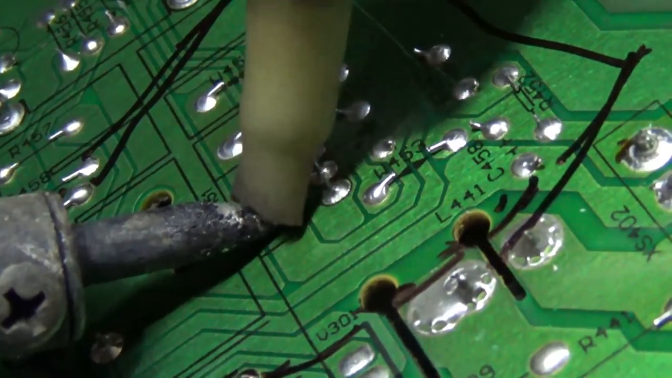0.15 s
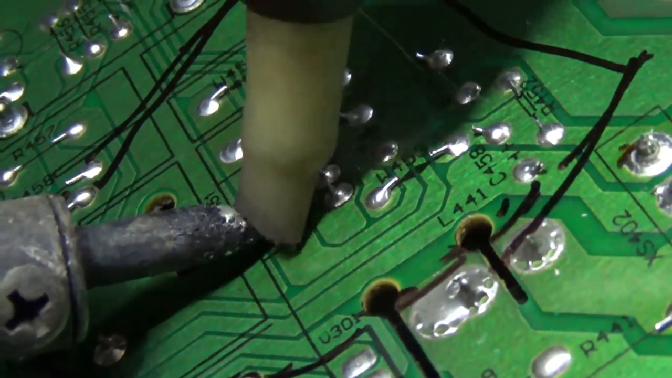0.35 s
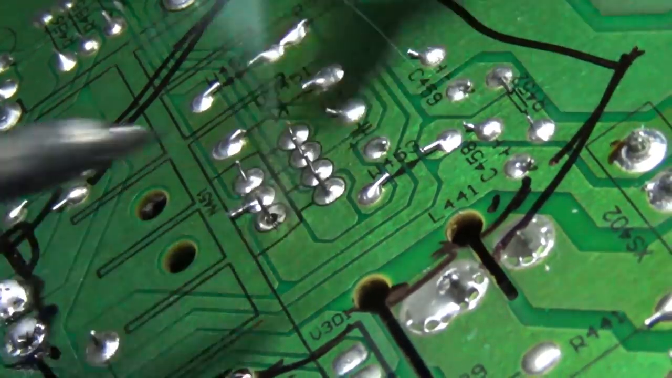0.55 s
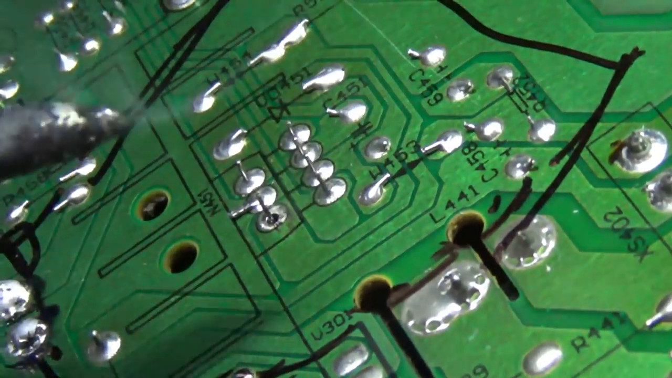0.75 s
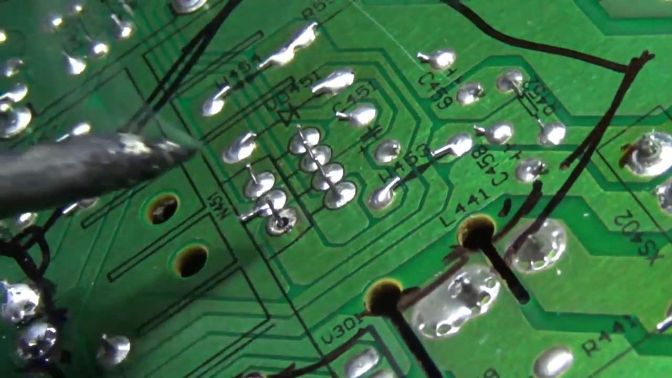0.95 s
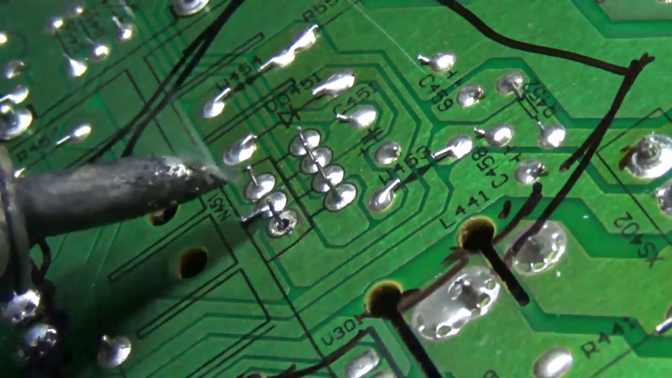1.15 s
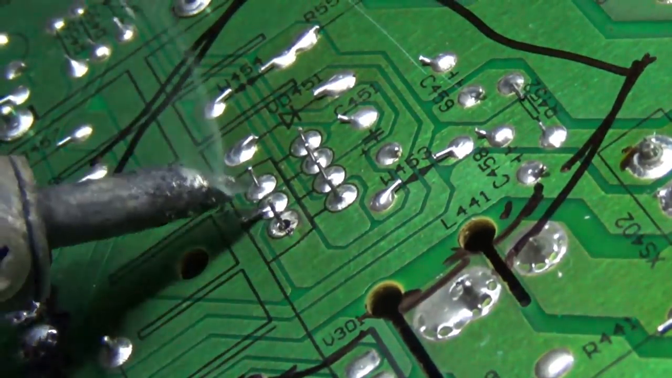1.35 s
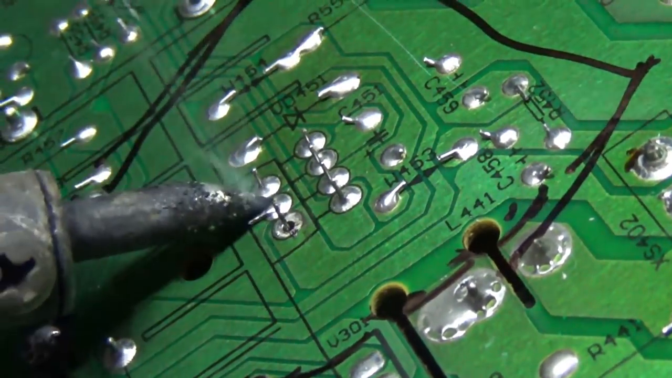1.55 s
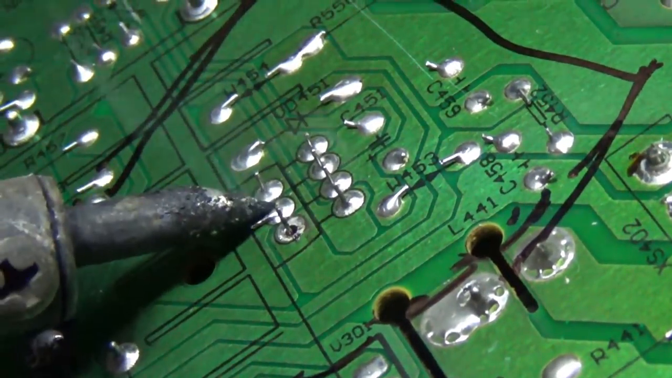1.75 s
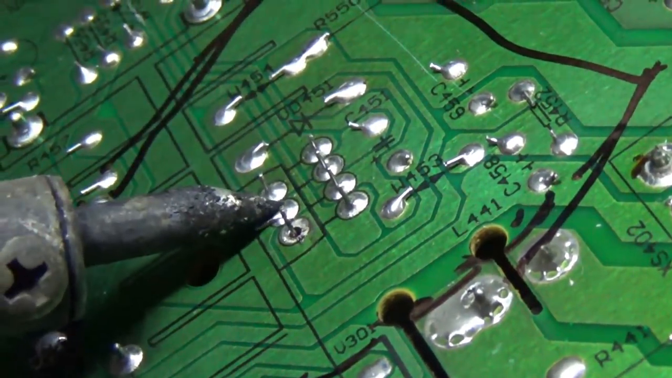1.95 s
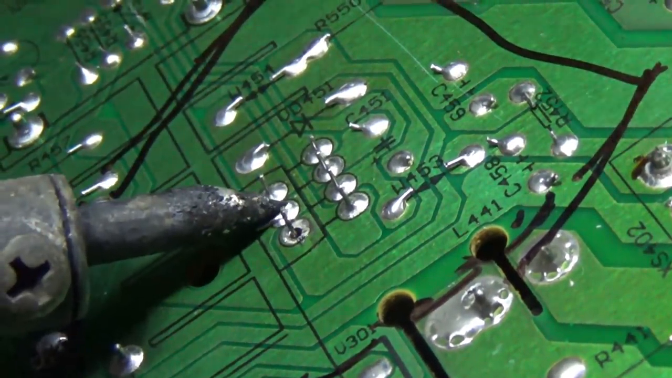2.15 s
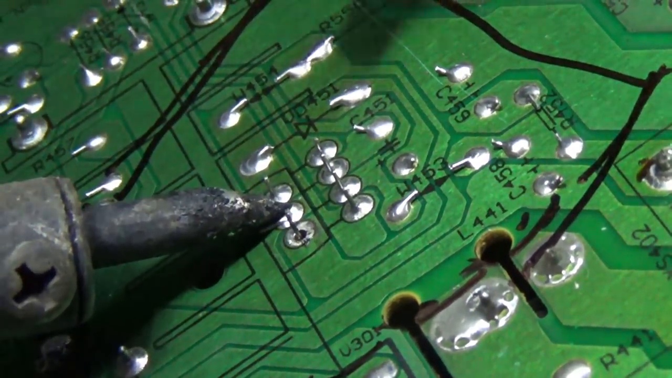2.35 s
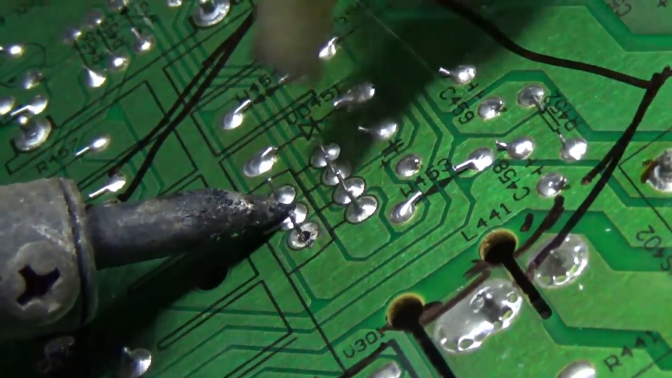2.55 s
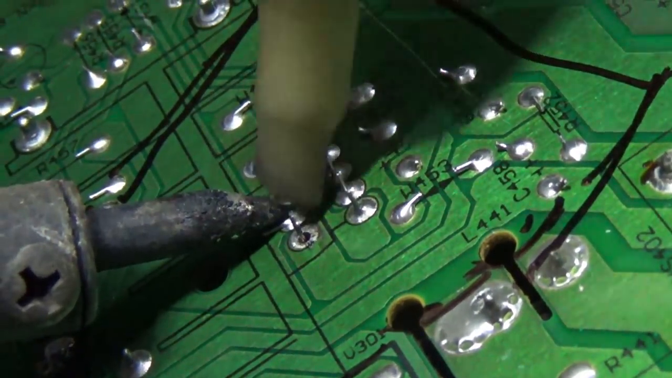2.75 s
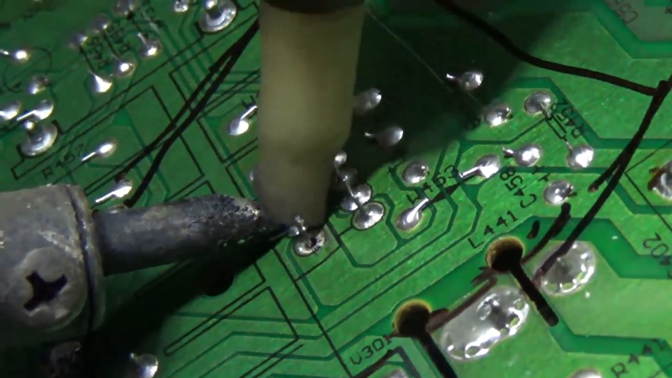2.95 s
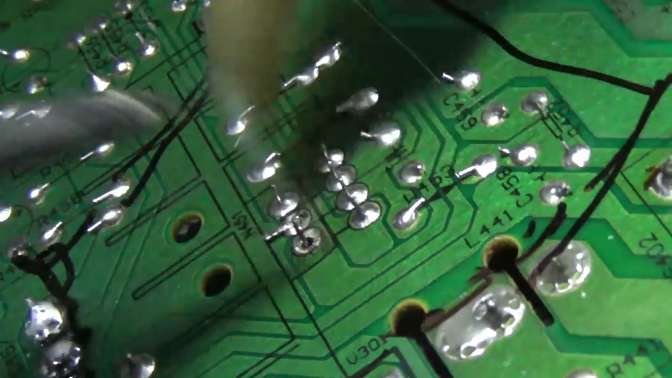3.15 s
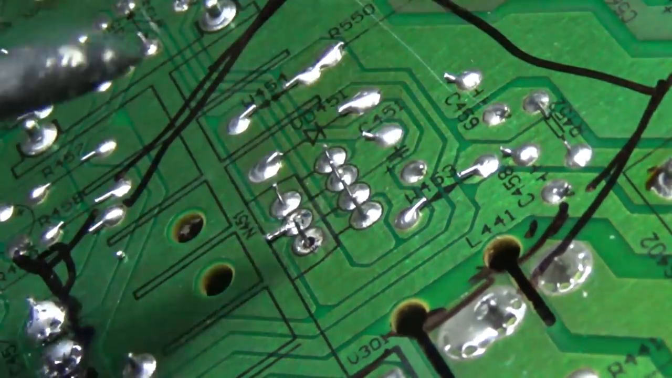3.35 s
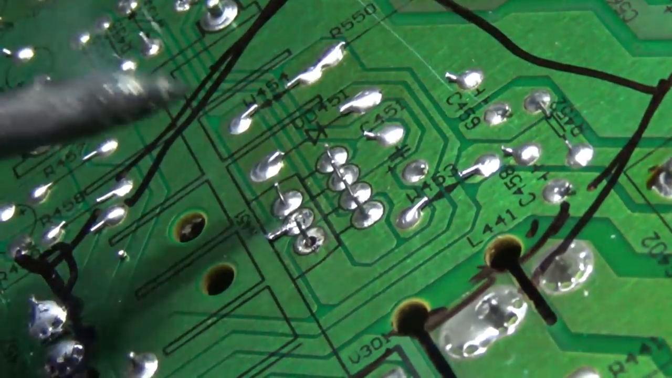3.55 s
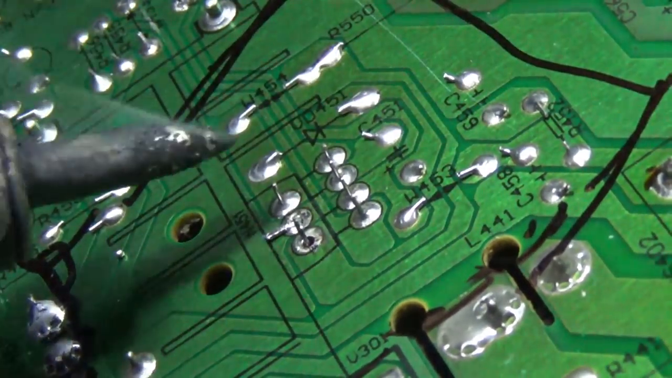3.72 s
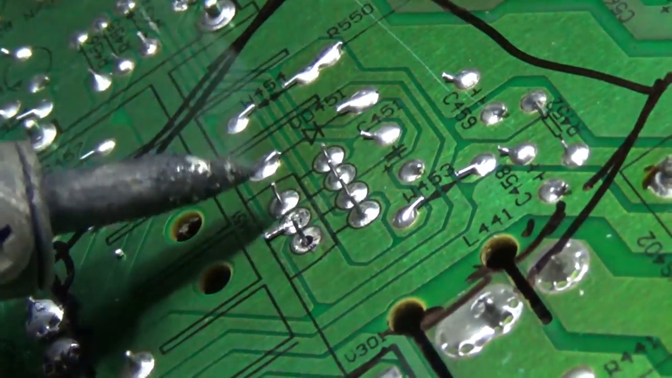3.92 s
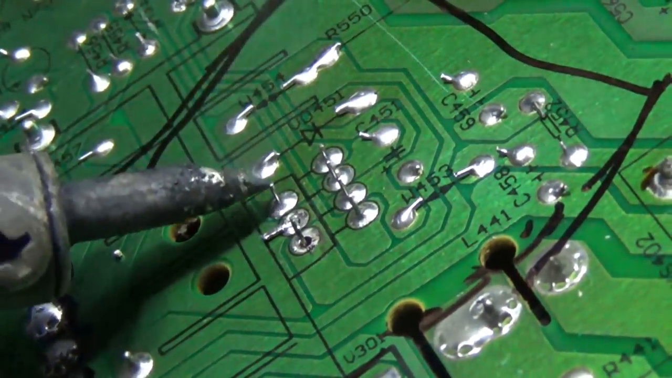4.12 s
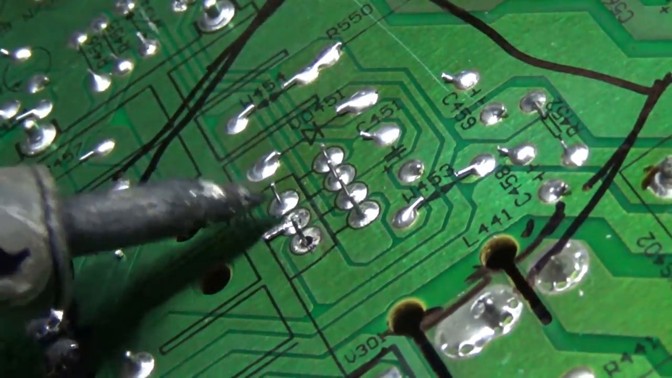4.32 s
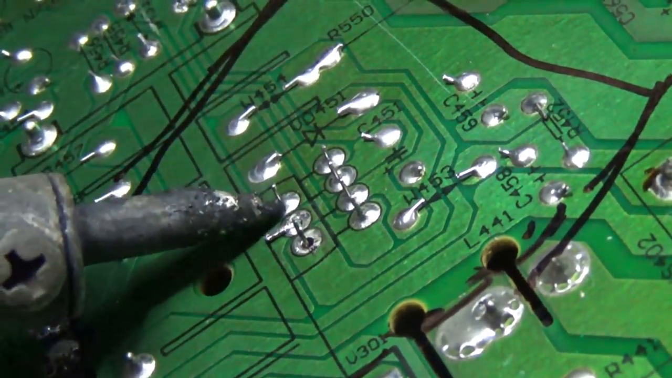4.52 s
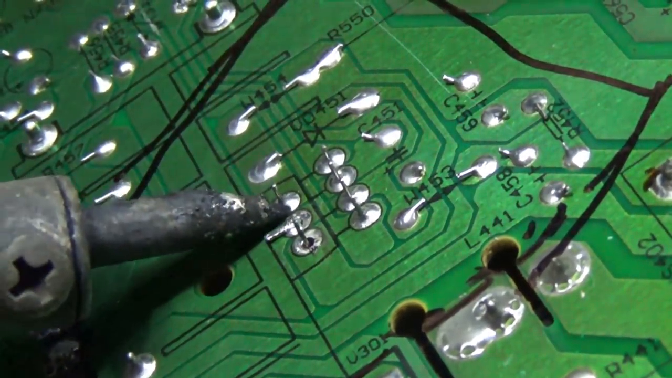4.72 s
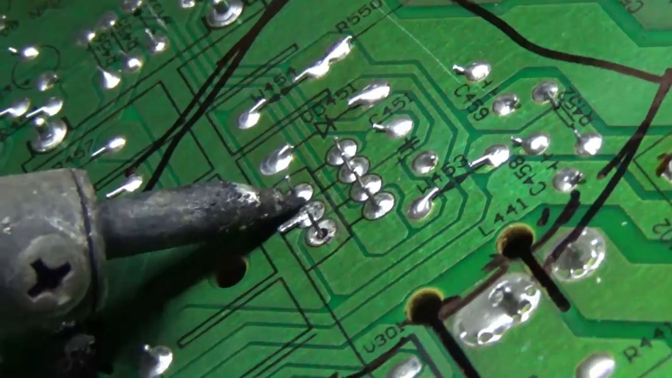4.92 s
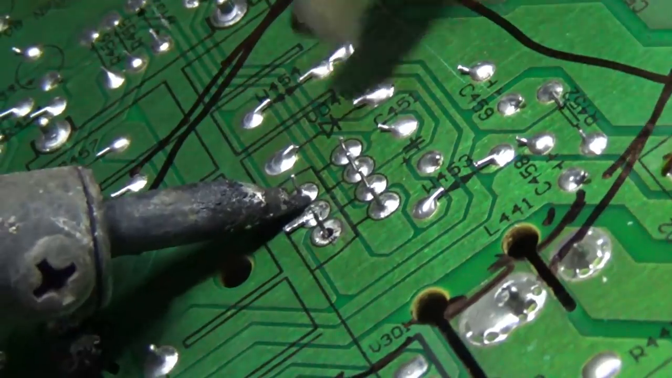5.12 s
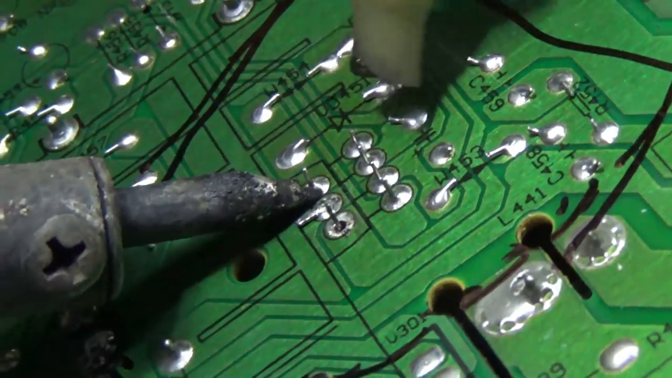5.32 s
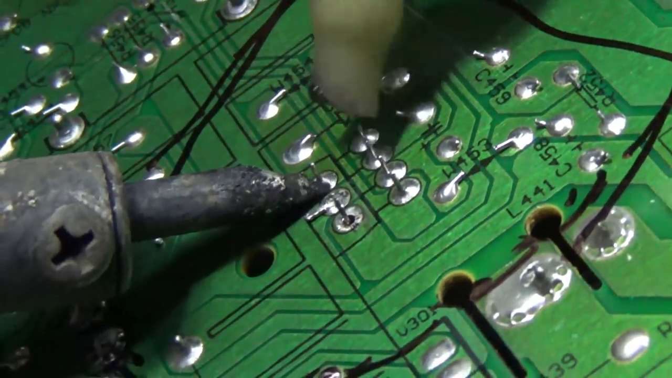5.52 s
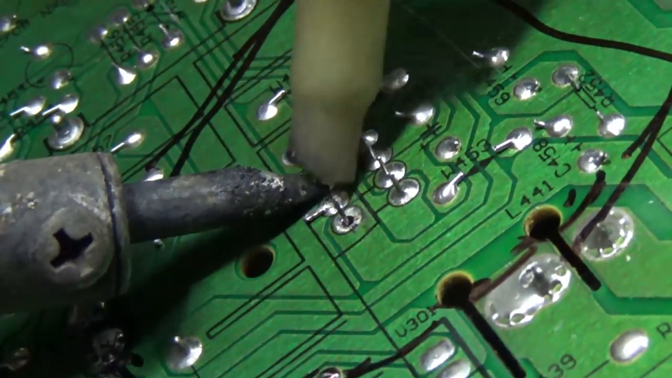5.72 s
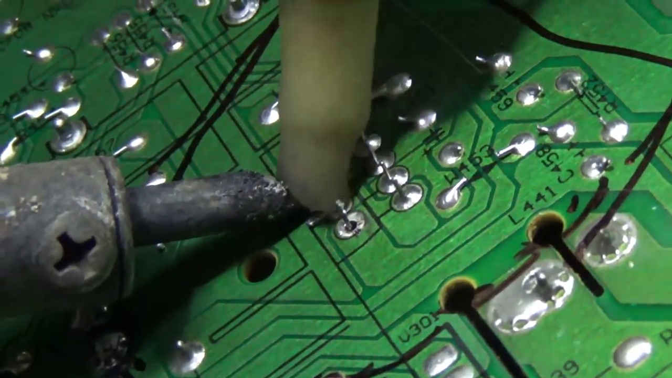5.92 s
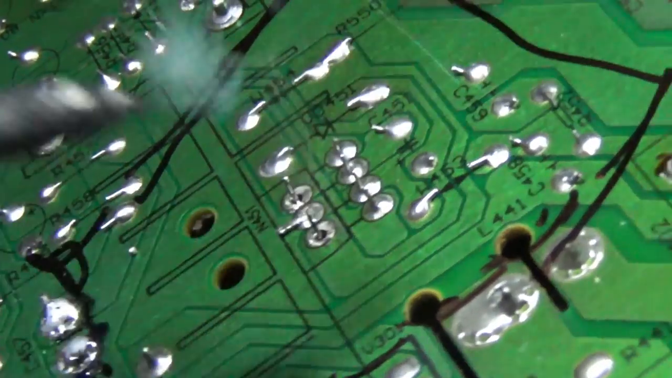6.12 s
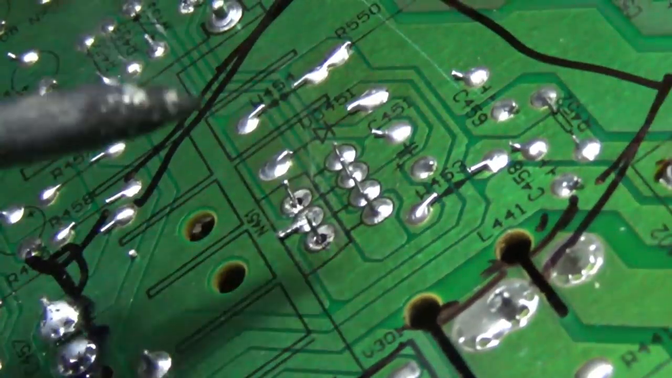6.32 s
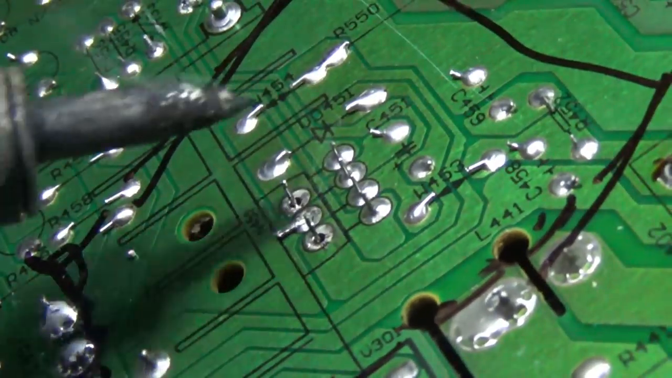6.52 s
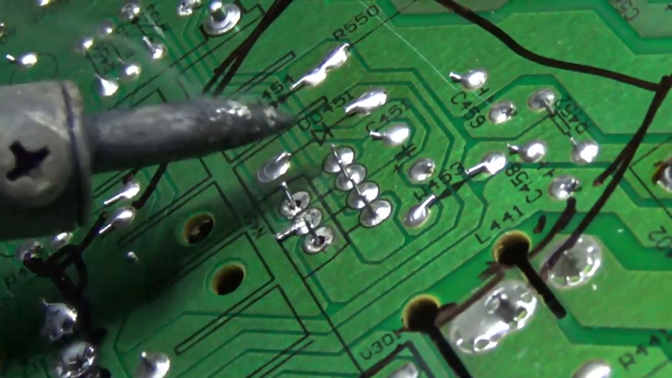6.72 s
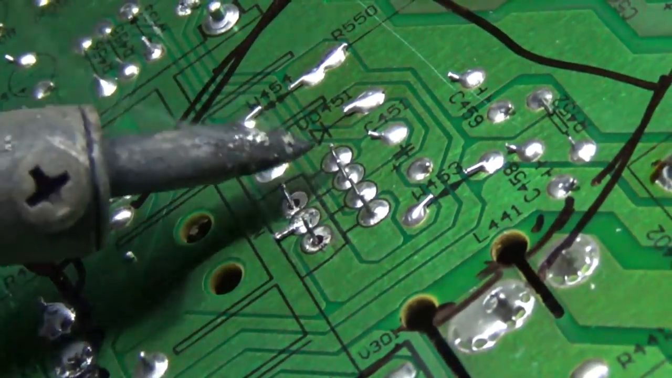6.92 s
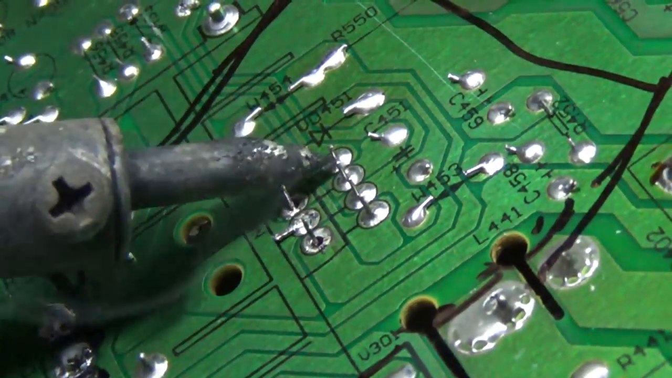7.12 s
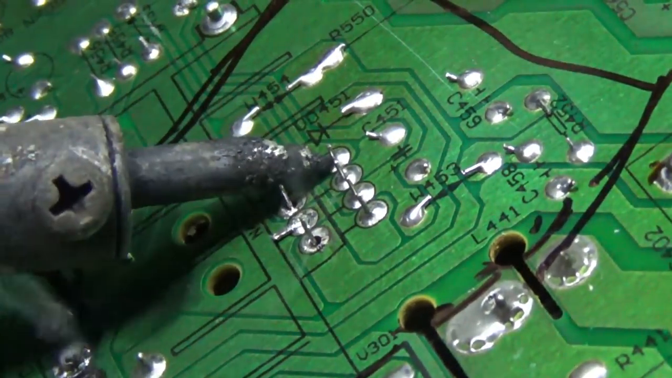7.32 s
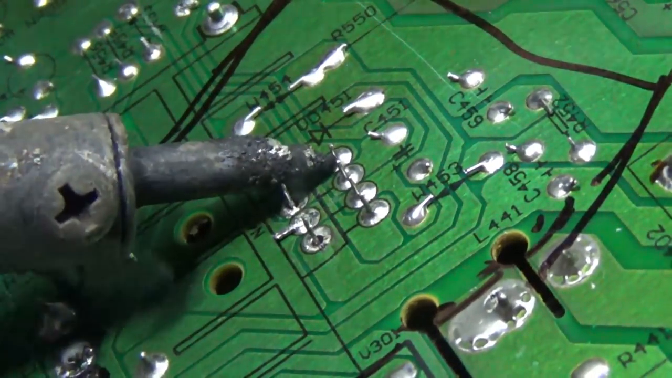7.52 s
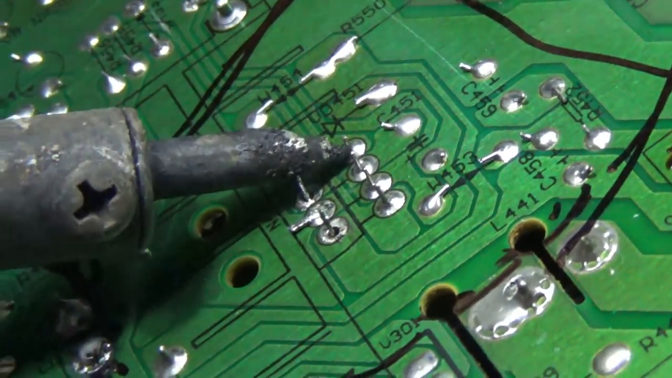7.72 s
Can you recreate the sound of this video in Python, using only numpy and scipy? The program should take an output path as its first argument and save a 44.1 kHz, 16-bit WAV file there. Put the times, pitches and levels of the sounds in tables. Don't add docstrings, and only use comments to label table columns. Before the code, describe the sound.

A small, quiet workroom with steady low hum, soft hiss and a very faint, fast high cricket throughout; the microphone is close to the bench. At 0.38 s a button clicks, and at 0.52 s a spring-loaded solder pump fires: a bright latch snap, spring slap, tiny air burst and hard piston slam within about fifteen milliseconds, then a hollow, springy shudder fading quickly. Light taps follow. From 1.04 s the plunger rubs dryly down its barrel, latching sharply at 1.26 s and clicking back at 1.43 s. Faint board knocks continue until the nozzle touches down at 2.82 s. The second shot cracks at 3.16 s; recocking scrapes from 3.7 s, latches at 3.86 s and clicks at 4.01 s. After a sparse pause, a tap at 5.59 s precedes the third shot at 6.11 s. Recocking runs from 6.67 s, latching at 6.92 s, with a softer click at 7.09 s, then small taps until 7.7 s.

```python
import sys
import numpy as np
from scipy import signal
from scipy.io import wavfile
from scipy.ndimage import uniform_filter1d

SR = 44100
rng = np.random.default_rng(int(sys.argv[2]) if len(sys.argv) > 2 else 0)


def store_pcm(level_fs):
    pcm = np.round(np.clip(level_fs, -1, 1) * 32767).astype(np.int16)
    wavfile.write(sys.argv[1], SR, np.atleast_2d(pcm).T)


def volts(x):
    e = np.asarray(x, float) / 20
    return 10 ** e


N = 342657


def evened(x):
    return x / np.sqrt(np.mean(x ** 2) + 1e-20)


def read(points, hz):
    f, value = np.transpose(points)
    return np.interp(np.log(hz + 1), np.log(f + 1), value)


def bumps_db(peaks, hz):
    return sum(db / (1 + (2 * (hz - f) / width) ** 2) for f, width, db in peaks)


def add(mix, s, sound):
    part = mix[..., round(s * SR):][..., :sound.shape[-1]]
    part += sound[..., :part.shape[-1]]


def resonate(x, hz, width):
    r = np.exp(-np.pi * width / SR)
    return signal.lfilter([1 - r, 0, r - 1], [1, -2 * r * np.cos(2 * np.pi * hz / SR), r * r], x)


def band(x, lo_hz, hi_hz):
    sos = signal.butter(2, [lo_hz, min(hi_hz, SR / 2.1)], "band", fs=SR, output="sos")
    return signal.sosfilt(sos, x)


def noise(length, shape_db, side, size=512):
    hz = np.fft.rfftfreq(size, 1 / SR)[:, None]
    t = np.arange(length * 4 // size + 5) * size / 4 / SR
    a, b, c, d = rng.standard_normal((len(t), len(hz), 4)).T
    mid = a + 1j * b
    apart = (c + 1j * d) * volts(read(side, hz))
    z = np.array([mid + apart, mid - apart]) * volts(shape_db(hz, t))
    return signal.istft(z, nperseg=size, noverlap=size * 3 // 4)[1][:, :length]


# (frequency [Hz], level per Hz [dB])
HUM = [(12, -45), (20, -19.5), (58, -3.5), (165, -5.5), (244, -1.5), (440, -6.5), (652, -5.5), (794, -6),
       (1080, -8), (2120, -12), (5830, -16.5), (7300, -17.5), (8890, -19), (15200, -23.5), (16500, -39.5)]
# (frequency [Hz], width [Hz], lift [dB])
HUM_PEAKS = [(222, 90, 2.5), (410, 39.8, 4.5), (640, 17, 9.5)]
# (frequency [Hz], side against mid [dB])
HUM_SIDE = [(60, -27), (180, -18.5), (550, -10), (1650, -6.5), (4970, -12), (15000, -25.5)]


def hum():
    level_db, swell_db, swell_s = -66, 1.2, .25

    def shape_db(hz, t):
        patches = uniform_filter1d(rng.standard_normal((len(t), len(hz))), 10, 0)
        patches = evened(uniform_filter1d(patches, 10, 1)).T
        drift = evened(uniform_filter1d(rng.standard_normal(len(t)), max(round(swell_s / t[1]), 1)))
        swell = swell_db * drift / (1 + (hz / 1500) ** 2)
        return read(HUM, hz) + bumps_db(HUM_PEAKS, hz) + patches + swell

    return volts(level_db) * evened(noise(N, shape_db, HUM_SIDE, size=2048))


# (time [s], chirps so far [count])
CHIRPS = [(.008, 0), (1.528, 14), (2.164, 20), (3.011, 28), (3.647, 34), (4.83, 45), (5.928, 55),
          (6.598, 61), (7.45, 69), (7.77, 72)]


def cricket(hz=7260, db=-75):
    s, count = np.transpose(CHIRPS)
    turn = (np.interp(np.arange(N) / SR, s, count) + .5) % 1 - .5
    wings = (.25 + np.cos(np.pi * 6 * turn) ** 2) * np.exp(-(turn / .25) ** 4)
    fuzz = resonate(resonate(rng.standard_normal(N), hz, 500), hz, 500)
    return volts(db) * wings * evened(fuzz)


# (frequency [Hz], t60 [s])
ROOM_T60 = [(200, .2), (1000, .15), (4000, .12), (12000, .08)]
# (frequency [Hz], side against mid [dB])
HIT_SIDE = [(60, -30), (180, -20.5), (550, -16.5), (1650, -10.5), (4970, -13), (15000, -35)]


def room(x):
    tail = noise(SR // 2, lambda hz, t: -60 * t / read(ROOM_T60, hz), HIT_SIDE, size=256)
    tail *= np.clip(np.arange(SR // 2) / SR / .004 - .5, 0, 1)
    return signal.fftconvolve(x[None], tail / np.linalg.norm(tail[0]), axes=1)[:, :N]


def thud(db, hz, t60):
    t = np.arange(6000) / SR
    blows = 0.062 * rng.standard_normal(len(t)) * volts(-60 * t / max(t60, .005))
    blows[0] = -1
    board = resonate(blows, hz, .6 * hz) + 0.27 * resonate(blows, 597, 140)
    board += 0.43 * min(600 / hz, 1) ** 2 * resonate(blows, 260, 54)
    board = band(band(board, 80, 1900), 80, 1900)
    return volts(db) * board / abs(board).max()


# (time [s], peak level [dB], ring
# [Hz], t60 [s])
THUDS = [(0.377, -46, 654, 0.062), (0.394, -50, 660, 0.03), (1.253, -51.5, 598, 0.035),
         (1.283, -39, 1370, 0.038), (1.427, -43.5, 406, 0.026), (1.6, -42.5, 616, 0.1),
         (2.025, -62.5, 509, 0.05), (2.454, -61, 659, 0.055), (2.758, -61.5, 696, 0.036),
         (2.82, -36.5, 1300, 0.05), (3.861, -50.5, 570, 0.055), (3.887, -44.5, 413, 0.05),
         (4.014, -47, 467, 0.07), (4.261, -46.5, 630, 0.096), (4.522, -56.5, 680, 0.042),
         (4.988, -56.5, 1060, 0.05), (6.248, -50, 996, 0.068), (6.919, -40, 1400, 0.038),
         (6.953, -51.5, 412, 0.042), (7.093, -45.5, 410, 0.059), (7.24, -51, 990, 0.043),
         (7.334, -53, 660, 0.064), (7.669, -47.5, 630, 0.11)]


def thuds():
    out = np.zeros(N)
    for s, db, hz, t60 in THUDS:
        add(out, s + .0016, thud(db + 1, hz, t60))
    return out


def click(db, hz, t60, knock_db, tick_db, cap_db=-40, scatter=0.25, spread=.22,
          rebound=0, rebound_s=.00061, cap_hz=4300):
    t = np.arange(2600) / SR
    blows = scatter * rng.standard_normal(len(t)) * volts(-60 * t / max(t60, .002))
    blows[0] = -1
    blows[round(rebound_s * SR)] -= rebound
    ring = resonate(resonate(blows, hz, spread * hz), hz, 1.8 * hz)
    ring = ring + .06 * band(blows, 2500, 8500)
    knock = resonate(blows, 2250, 700) + .8 * resonate(blows, 2400, 700)
    knock += 0.88 * resonate(blows, 3300, 800)
    tick = band(blows, 9000, 15000)
    cap = resonate(blows, cap_hz, .18 * cap_hz)
    out = np.zeros(len(t))
    for k, (part, part_db) in enumerate(((ring, 0), (knock, knock_db), (tick, tick_db), (cap, cap_db))):
        out += volts(db + part_db) * np.roll(part, 5 * k) / abs(part).max()
    return out


# (time [s], peak level [dB], ring [Hz], barrel knock [dB])
TAPS = [(0.4945, -38, 5200, -1.5), (0.5603, -27.5, 2400, -8.5), (0.7104, -54.5, 4850, -3.5),
        (0.7432, -47, 5010, -29), (0.793, -39, 4990, -38), (0.9406, -53.5, 2700, -9.5),
        (1.36, -56, 2800, -15), (1.807, -52, 2650, -17), (2.9668, -58, 2736, -10), (3.2644, -45, 2610, -13),
        (3.3495, -62, 5060, 3), (3.3892, -47.5, 4760, -21), (3.4425, -41, 4940, -41),
        (3.5752, -53.5, 2650, -16), (3.975, -53, 3300, -8), (4.2622, -56.5, 4120, -11),
        (4.3979, -58, 2660, -7), (4.858, -63, 3160, -6), (5.5942, -56, 2600, -3), (6.1504, -31, 2050, -15),
        (6.227, -49, 4000, -15), (6.3058, -55.5, 4320, -5), (6.3415, -51, 5100, -28),
        (6.3959, -40, 4800, -37), (6.9533, -45, 5400, -19), (7.2419, -55.5, 4350, -16),
        (7.3339, -61, 2760, -14), (7.5038, -55, 3830, -14.5), (7.64, -57.5, 4080, -8),
        (7.672, -46, 4000, 3)]


def taps():
    out = np.zeros(N)
    for s, db, hz, knock_db in TAPS:
        add(out, s + .0008, click(db + 4, hz, .016 - .0005 * (db + 45), knock_db, tick_db=-27))
    return out


# (frequency [Hz], width [Hz])
RUB = [(3700, 1500), (5900, 1150)]


def slide(effort, travel):
    s, level = np.transpose(effort)
    share, *colours = np.transpose(travel)
    t = np.arange(s[0], s[-1] + .006, 1 / SR)
    db = np.interp(t, s, level)
    upper_db, hiss_db, body_db = (np.interp((t - s[0]) / (s[-1] - s[0]), share, c) for c in colours)
    chance = rng.standard_normal((len(t), 8)).T
    clumps = evened(uniform_filter1d(chance[4:] + .6 * chance[4], 120, axis=1))
    a, b, c, d = chance[:4] * volts(2.8 * clumps)
    lower = band(resonate(a, *RUB[0]), 2700, 6000)
    upper = resonate(resonate(b, *RUB[1]), *RUB[1])
    hiss = band(resonate(c, 7500, 3500), 4900, 16000)
    body = band(band(d, 1100, 2800), 1100, 2800)
    parts = ((lower, 0), (upper, upper_db), (hiss, hiss_db), (body, body_db))
    rub = sum(volts(db + part_db) * evened(part) for part, part_db in parts)
    return s[0], rub * signal.windows.tukey(len(t), .04)


# (time [s], level [dB])
STROKES = [
    [(1.04, -80), (1.056, -54.5), (1.094, -55), (1.13, -60), (1.16, -56.5), (1.21, -57), (1.249, -60),
     (1.268, -54), (1.305, -74)],
    [(3.685, -80), (3.701, -54), (3.73, -56), (3.765, -53.5), (3.813, -52.5), (3.841, -57), (3.857, -52),
     (3.875, -52), (3.905, -73)],
    [(6.665, -70), (6.695, -54.5), (6.74, -61), (6.763, -51.5), (6.877, -54), (6.897, -58), (6.916, -52),
     (6.935, -54), (6.968, -72)],
]
# (share of the stroke [0-1], upper tone [dB], hiss [dB], body [dB])
TRAVEL = [(0, -5, -3, -20), (.3, -7, -4, -14), (.7, -1, -3, -12), (.765, -3, -13, -12), (.9, 1.5, 0.5, 1.5),
          (1, -4, -2, -4)]
# (end time [s], level [dB])
RETURNS = [
    (1.421, -62),
    (4.009, -62),
    (7.085, -59),
]
# (share of the stroke [0-1], upper tone [dB], hiss [dB], body [dB])
RETURN_COLOUR = [(0, 8, -1, -8), (1, 4, 3, -4)]


def strokes():
    return_s, rise_db = .018, 14
    out = np.zeros(N)
    for effort in STROKES:
        add(out, *slide(effort, TRAVEL))
    for end, db in RETURNS:
        add(out, *slide([(end - return_s, db - rise_db), (end, db)], RETURN_COLOUR))
    return out


# (time [s], peak level [dB], ring [Hz])
PRESSES = [
    (.3787, -25, 5800),
    (.3948, -36, 2100),
]
BUTTON = dict(t60=.018, knock_db=-1.5, tick_db=-9, cap_db=-3, cap_hz=3300, spread=.3, rebound=.3)
TOUCHES = [
    (2.8207, -32.5, 4470),
]
NOZZLE = dict(t60=.018, knock_db=-3, tick_db=-28, cap_db=-5, spread=.17, rebound=.9)
CATCHES = [
    (1.2392, -35, 3300),
    (3.8486, -33, 3000),
    (3.8668, -27, 4100),
    (6.9047, -33, 3100),
]
CATCH = dict(t60=.018, knock_db=-10, tick_db=-12, cap_db=-5, cap_hz=7500, spread=.25, rebound=.4)
LATCHES = [
    (1.2567, -20.5, 6300),
    (3.8633, -19, 6400),
    (6.9239, -21, 6430),
]
LATCH = dict(t60=.018, knock_db=-5, tick_db=-5, cap_db=-4, spread=.15, rebound=.9, rebound_s=.00047)
END_STOPS = [
    (1.4284, -23, 5700),
    (4.015, -22, 5800),
    (7.092, -28, 5750),
]
END_STOP = dict(t60=.014, knock_db=-11, tick_db=-26, cap_db=-9, cap_hz=8900, spread=.11, rebound=.05)


def pump_clicks():
    out = np.zeros(N)
    for part, rows in ((BUTTON, PRESSES), (NOZZLE, TOUCHES), (CATCH, CATCHES),
                       (LATCH, LATCHES), (END_STOP, END_STOPS)):
        for s, db, hz in rows:
            add(out, s, click(db, hz, scatter=.15, **part))
    return out


SHOTS = [
    .5155,
    3.1605,
    6.1078,
]
STAGES = [
    0,
    .0019,
    .0053,
    .0117,
    .0149,
]
# (level [dB], held [s], bench thump [dB])
SHUDDERS = [
    (-30, 0.027, -63),
    (-31, 0.04, -64),
    (-30.5, 0.034, -60),
]
# (frequency [Hz], level per Hz [dB])
SHUDDER = [(29, -50.5), (50, -12.5), (218, -6.5), (483, -11.5), (646, -3), (1020, -4.5), (1150, -1.5),
           (1960, -5), (2380, -3), (3410, -5.5), (5020, -2.5), (6550, -11), (10900, -10), (16000, -22)]
# (frequency [Hz], t60 [s])
SHUDDER_T60 = [(60, 0.12), (200, 0.11), (700, 0.15), (2500, 0.15), (6000, .17), (14000, 0.1)]
# (frequency [Hz], width [Hz], lift [dB])
BARREL = [(257, 10, 12), (639, 62, 8.5), (1390, 150, 3), (1785, 150, 7), (2330, 50, 5), (5200, 500, 2)]


def shudders():
    out = np.zeros((2, N))
    t_out = np.arange(SR // 2) / SR
    for s, (db, held, thump_db) in zip(np.add(SHOTS, STAGES[3]), SHUDDERS):
        def shape_db(hz, t):
            fall = .5 * t + 0.44 * np.maximum(t - held, 0)
            return read(SHUDDER, hz) + bumps_db(BARREL, hz) - 60 * fall / read(SHUDDER_T60, hz)

        tail = band(noise(SR // 2, shape_db, HIT_SIDE), 70, 20000)
        clumps = evened(uniform_filter1d(rng.standard_normal(SR // 2), 90))
        tail *= volts(2.0 * clumps)
        rise = 1 - np.exp(-t_out / 0.0059)
        add(out, s, volts(db) * rise * tail / np.sqrt(np.mean(tail[:, :1300] ** 2)))
        swing = t_out / .04 * np.exp(1 - t_out / .04)
        sway = band(resonate(rng.standard_normal(len(t_out)), 95, 50), 55, 260)
        add(out, s, volts(thump_db) * swing * evened(sway))
    return out


# (frequency [Hz], level [dB], t60 [s])
RINGS = [(239, -44, .15), (418, -48.5, .12), (632, -42, 0.15), (676, -45, 0.23), (1218, -43, 0.13),
         (1504, -38, 0.18), (1740, -38.5, 0.12), (1796.4, -38.5, .15), (1864, -43.5, 0.18),
         (2180, -42.5, .12), (2340, -38.5, .15), (2666, -42, .12), (3980, -42, 0.13), (4780, -39, .1),
         (5240, -40, .1)]


def rings():
    out = np.zeros(N)
    t = np.arange(SR // 3) / SR
    for s in np.add(SHOTS, STAGES[3]):
        for hz, db, t60 in RINGS:
            level_luck, pitch_luck = rng.standard_normal(2)
            tone = np.sin(2 * np.pi * hz * (1 + .003 * pitch_luck) * t)
            add(out, s, volts(db + 2.0 * level_luck - 60 * t / t60) * tone)
    return out


# (frequency [Hz], level per Hz [dB])
RUSH = [(290, -48.5), (500, -11.5), (3700, -1.5), (4870, -19), (6140, -4.5), (7860, -3.5), (12100, -4.5),
        (16000, -18.5)]


def rushes():
    after_s, length_s, lead_s, level_db = .001, .0083, .006, -24.5
    out = np.zeros((2, N))
    t = np.arange(1300) / SR - lead_s
    burst = 1 / (1 + np.exp(-t / .0004)) / (1 + np.exp((t - length_s) / 0.00058))
    lead = volts(-25) * np.clip(1 + t / lead_s, 0, 1) * (t < length_s + .004)
    for s in SHOTS:
        air = evened(noise(len(t), lambda hz, _: read(RUSH, hz), HIT_SIDE, size=128))
        add(out, s + after_s - lead_s, volts(level_db) * air * (burst + lead))
    return out


# (peak level [dB], ring [Hz], t60 [s], barrel knock [dB], bright tick [dB])
BLOWS = [
    (-5.5, 8000, .007, -20, -17),
    (-13, 5300, .005, -12, -12),
    (-17, 6300, .007, -18, -4),
    (-5, 4500, .007, -6, -18),
    (-16, 2900, .004, -6, -14),
]
SPREADS = [.13, .3, .25, .38, .3]
# (latch [dB], rebound [dB], spring slap [dB], slam [dB], echo [dB])
FORCES = [
    (0.5, -1, -6, .5, -2),
    (0.1, 0.1, 0.1, -1.5, 2.5),
    (-.5, 2, 4.5, .5, -1),
]


def shots():
    out = np.zeros(N)
    for s, forces in zip(SHOTS, FORCES):
        for delay, spread, force_db, (db, *row) in zip(STAGES, SPREADS, forces, BLOWS):
            add(out, s + delay, click(db + force_db, *row, scatter=.12, spread=spread))
    return out


def scene():
    near = thuds() + taps() + strokes() + pump_clicks() + rings() + shots()
    apart = volts(-20.5) * np.roll(near, 40) * [[1], [-1]]
    background = hum() + cricket()
    return background + near + apart + volts(-25.5) * room(near) + shudders() + rushes()


def band_limit(x):
    return signal.sosfilt(signal.butter(12, 16830, fs=SR, output="sos"), x)


def record(dry):
    t = np.arange(N) / SR
    keep = np.ones(N)
    for shot in SHOTS:
        keep[(t > shot - .016) & (t < shot - .005)] = .02
    dull = signal.oaconvolve(dry, signal.firwin(101, 16000, fs=SR)[None], "same")
    return band_limit(dull * uniform_filter1d(keep, 60))


dry = scene()
out = record(dry)
store_pcm(out)
```